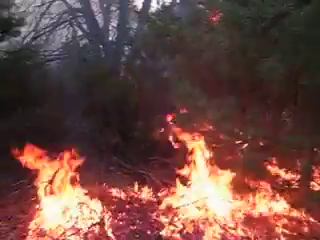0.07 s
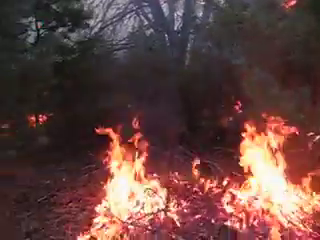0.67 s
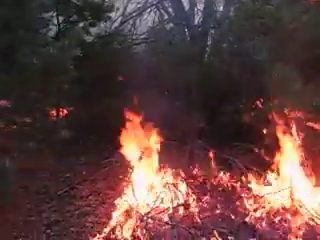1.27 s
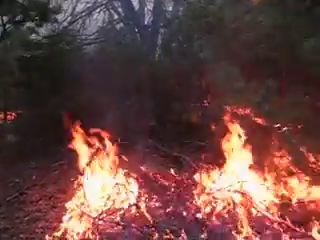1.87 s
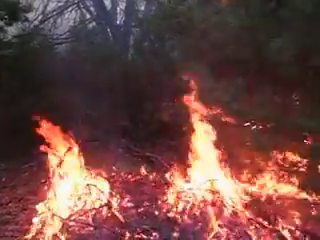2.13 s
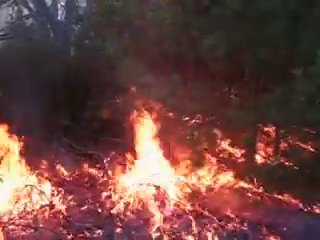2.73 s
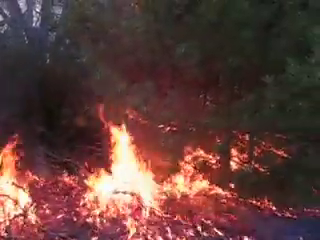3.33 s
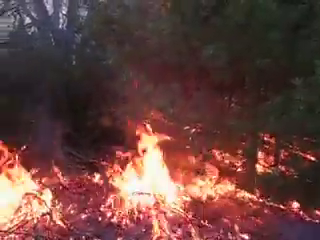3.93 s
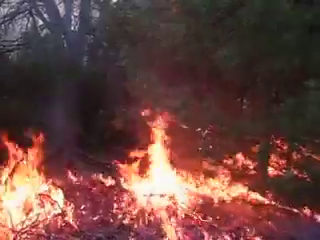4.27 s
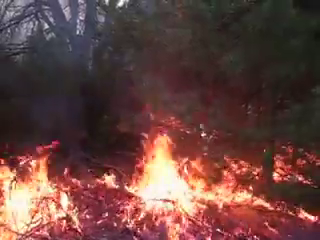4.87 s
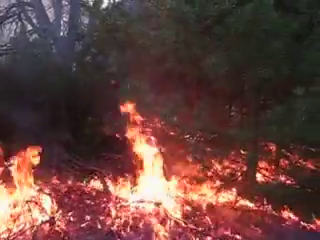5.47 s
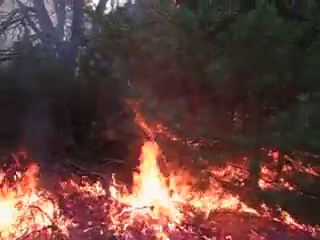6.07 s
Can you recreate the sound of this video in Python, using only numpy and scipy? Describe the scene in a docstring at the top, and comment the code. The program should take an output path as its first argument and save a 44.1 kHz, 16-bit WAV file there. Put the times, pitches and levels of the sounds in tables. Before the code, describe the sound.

A brush fire burns in a wood with a low steady roar, sizzling crackles and sharp snaps of branches.

```python
"""Two heaps of brush burn at the edge of a wood, a few metres from a small camera.
From the start the flames roar low, needles and twigs sizzle and crackle, and the camera whines faintly.
Branches snap and sticks pop throughout; the limiter ducks the roar briefly after each loud snap.
Split branches vent steam in short puffs at 1.3 s and 2.1 s, then in a longer, fainter jet at 3.5 s."""
import sys
import numpy as np
from scipy import signal
from scipy.fft import rfft, irfft, next_fast_len
from scipy.io import wavfile
from scipy.ndimage import uniform_filter1d, minimum_filter1d, map_coordinates

SR = 44100
rng = np.random.default_rng(int(sys.argv[2]) if len(sys.argv) > 2 else 0)


def persist_wave(psi):
    """Save psi, clipped to +-1, as 16-bit WAV."""
    counts = np.round(np.clip(psi, -1, 1) * 32767).astype(np.int16)
    wavfile.write(sys.argv[1], SR, np.atleast_2d(counts).T)


N = 269010


def amp(db):
    """Amplitude grows tenfold every 20 dB."""
    return 10 ** (np.asarray(db) / 20)


def unit(x):
    """Normalisation to an rms of 1."""
    return x / np.sqrt(np.mean(x ** 2) + 1e-20)


def along(points, hz):
    """Interpolation of (frequency, value) points on a logarithmic frequency axis."""
    frequencies, values = np.transpose(points)
    return np.interp(np.log(hz + 1), np.log(frequencies + 1), values)


def curves(rows):
    """Linear interpolation in time: one value per sample for each column after the first."""
    times, *columns = np.transpose(rows)
    return [np.interp(np.arange(N) / SR, times, column) for column in columns]


def wobble(rate):
    """Smooth random modulation: a spline through rate Gaussian knots a second."""
    return map_coordinates(rng.standard_normal(size=4096), [np.arange(N) * rate / SR], mode="wrap")


def filtered(x, response):
    """Linear filtering multiplies the spectrum by a frequency response."""
    size = next_fast_len(N + SR // 2)
    return irfft(rfft(x, size) * response(np.fft.rfftfreq(size, 1 / SR)), size)[:N]


def rush(spectrum, patchy_db):
    """Coloured noise of rms 1, modulated in random patches of time and frequency."""
    cells = signal.stft(rng.standard_normal(N), nperseg=512)[2]
    patches = uniform_filter1d(rng.standard_normal(cells.shape), size=9, axis=0)
    patches = uniform_filter1d(patches, size=10, axis=1)
    noise = signal.istft(cells * amp(patchy_db * unit(patches)), nperseg=512)[1][:N]
    return unit(filtered(noise, lambda hz: amp(along(spectrum, hz))))


def bursts(times, db, ring_hz, q, scatter_db, scatter_t60, size=512):
    """Impulse response: each pressure pulse rings a damped splinter and scatters off nearby twigs."""
    hz, t = np.fft.rfftfreq(size, 1 / SR), np.arange(size) / SR
    centre, width = ring_hz[:, None], (ring_hz / np.maximum(q, .3))[:, None]
    splinter = 1j * hz * width / (centre ** 2 - hz ** 2 + 1j * hz * width)
    fade = amp(-60 * t / scatter_t60)
    twigs = amp(scatter_db) * rng.standard_normal((len(times), size)) * fade / np.linalg.norm(fade)
    waves = amp(db)[:, None] * irfft(splinter * (1 + rfft(twigs)))
    where = np.round(times * SR).astype(int)[:, None] + np.arange(size)
    return np.bincount(where.ravel(), waves.ravel(), N)[:N]


def flames(roar_db):
    """Turbulent combustion radiates low noise that flutters as tongues of flame tear off."""
    # spectrum of the flames: (frequency [Hz], relative density [dB])
    spectrum = [(10, -8.5), (22, -3.5), (48, -2.5), (68, -1), (95, -4.5), (130, -5.5), (165, -8), (208, -9),
                (270, -14.5), (400, -20.5), (700, -25), (1300, -31.5), (2500, -36), (6000, -57)]
    flutter_db = 0.41 * wobble(5.69) + wobble(22)
    return amp(roar_db + 4.5 + flutter_db) * rush(spectrum, patchy_db=0.44)


def sizzle(sizzle_db):
    """Superposition: countless tiny bursts of boiling sap merge into a restless, grainy hiss."""
    # spectrum of sap boiling in needles and twigs: (frequency [Hz], relative density [dB])
    spectrum = [(200, -50), (800, -10), (1500, -6), (2200, -6.5), (3200, -1), (4300, 0.5), (5500, -4.5)]
    surge_db = 1.2 * wobble(60)
    grain_db = 3 * wobble(900)  # each tiny burst lasts about a millisecond
    hiss = unit(amp(grain_db) * rush(spectrum, patchy_db=1.0))
    return amp(sizzle_db + 4.0 + surge_db) * hiss


def whine(hz=1823):
    """The camera's faint pure tone wavers by slow phase modulation."""
    return amp(-51.0) * np.sin(2 * np.pi * hz * np.arange(N) / SR + .5 * wobble(3.9))


def crackle(sizzle_db, count=900):
    """A random point process: twigs crack in flurries, at a rate that follows the sizzle."""
    when, force, sharpness = rng.random((count, 3)).T
    activity = np.cumsum(amp(sizzle_db + 2.2 * wobble(23)))
    times = np.searchsorted(activity / activity[-1], when) / SR
    db = -10 + 15 * np.tanh(-.33 * np.log(1 - force))  # many faint ticks, few strong ones
    ring_hz = np.clip(4400 * np.exp(0.27 * rng.standard_normal(count)), 700, 6000)
    q = .9 + 3 * sharpness ** 2
    return bursts(times, db, ring_hz, q, scatter_db=-6, scatter_t60=.008)


def woodland(x, t60):
    """Reverberation: scattering by trunks and foliage returns a diffuse, exponentially decaying tail."""
    t = np.arange(SR // 2) / SR
    build_up = 1 - np.exp(-t / 0.037)
    tail = rng.standard_normal(len(t)) * amp(-60 * t / t60) * build_up
    return signal.fftconvolve(x, tail / np.linalg.norm(tail))[:N]


def snaps():
    """Fracture of thicker wood radiates a sharp report; the recoiling branch adds a dull knock."""
    # branches bursting open:
    # (time [s], impulse level [dB], resonance [Hz], quality factor [-], knock impulse level [dB])
    fractures = [(0.0528, 10, 1660, 1, 24.5), (0.1154, 11, 4200.0, 3.0, -5.5), (0.1866, 5.5, 4130, 3.0, -8),
                 (0.2356, 10.5, 4900.0, 2.6, 1), (0.4059, 10.0, 4830, 3.0, 6),
                 (0.4648, 10.5, 4500.0, 4.4, -2), (0.4867, 16.5, 2720, 0.67, 10),
                 (0.6235, 10.5, 2600.0, 1.7, 9), (0.7122, 13.5, 3640, 2.7, -4),
                 (0.7235, 13, 5100.0, 0.7, -1.0), (0.8938, 5, 4200.0, 1.5, 9.5),
                 (0.9794, 14.5, 4070, 2.4, 11), (1.0239, 13.5, 3100.0, 0.53, 9.5),
                 (1.0807, 20.5, 3300, 1.6, 2), (1.1117, 14.5, 3390, 0.89, -3.5),
                 (1.1828, 14.5, 2900, 1.8, 16.5), (1.2621, 19, 3570, 3.0, 18), (1.6127, 9, 5000.0, 1.3, 1),
                 (1.6457, 10, 2900.0, 0.42, 3.5), (1.6491, 13.5, 5200.0, 0.5, -7.5),
                 (1.666, 19.5, 4800, 0.92, 20.5), (1.775, 8, 3400, 3.9, -6), (1.7963, 24.5, 4180, 3, 9),
                 (2.0893, 9, 3200.0, 1.8, -4), (2.1285, 11.5, 5230, 1.1, -1), (2.3061, 6.5, 5130, 1.2, -5),
                 (2.3495, 9.5, 3950, 1.4, -5.5), (2.4539, 14.0, 4600.0, 2, 4.5),
                 (2.489, 10, 3400, 1.7, -4.5), (2.8105, 8, 4000.0, 2.6, 4.5), (2.9263, 6, 3020, 0.5, 0),
                 (3.0034, 16, 5200.0, 2.2, -2.0), (3.0959, 8, 2200.0, 3.0, -6),
                 (3.2494, 11.5, 3900.0, 0.7, 13.0), (3.3015, 24, 3850, 4.6, 18.5),
                 (3.366, 26.5, 2050, 1.96, 7), (3.859, 3.5, 2500.0, 1.0, 5.5), (3.948, 10, 1500, 1.9, 15.5),
                 (4.0588, 12.5, 3120, 1.3, -2.5), (4.0937, 11.5, 3000.0, 0.91, 8.0),
                 (4.4307, 10.5, 2400.0, 1.1, 3), (4.805, 16.5, 4230, 1, 4), (4.8474, 11.5, 2960, 3.2, 1),
                 (4.9473, 17.0, 1800.0, 0.66, 1.5), (5.0645, 22, 3300, 1.33, 13.5),
                 (5.2868, 14, 5230, 1.1, 2.0), (5.3309, 9.5, 2600, 1.7, 15), (5.6959, 21, 2800, 1.75, 13.5),
                 (5.751, 13, 1980, 0.39, 9), (5.9638, 14.0, 2900.0, 3.5, 1.5), (5.9983, 14, 3600.0, 0.6, 1),
                 (6.0236, 6.5, 3260, 1.8, 7)]
    times, db, ring_hz, q, knock_db = np.transpose(fractures)
    report = bursts(times, db, ring_hz, q, scatter_db=-7, scatter_t60=.008)
    branch_hz = 770 * np.exp(0.22 * rng.standard_normal(len(times)))
    knock = bursts(times, knock_db, branch_hz, q=1.1, scatter_db=-6, scatter_t60=0.017)
    return report + knock


def pops(count=36):
    """Heavily damped resonance: sticks pop at random, weaker than branches and duller than twigs."""
    when, pitch = rng.random((2, count))
    db = np.full(count, 3)
    ring_hz = 3200 * np.exp(0.44 * (2 * pitch - 1))
    return bursts(when * N / SR, db, ring_hz, q=0.63, scatter_db=-4.5, scatter_t60=0.0056)


def limiter(x, threshold_db, release_s, slope, size=33):
    """Compression: gain drops within a millisecond at a peak over the threshold, then recovers."""
    peak = -minimum_filter1d(-np.abs(x), size)
    excess = np.maximum(peak / amp(threshold_db) - 1, 1e-9)
    age = np.arange(N) / SR / release_s
    held = np.exp(np.maximum.accumulate(np.log(excess) + age) - age)  # each peak decays exponentially
    return x / (1 + uniform_filter1d(held, size, origin=size // 2)) ** slope


def steam():
    """Jet noise starts at once and sputters out as the driving pressure falls exponentially."""
    # steam escaping from split branches: (time [s], level [dB], 60 dB decay time [s])
    vents = [(1.262, -16, 0.28), (2.09, -25, 0.14), (3.538, -31, 0.87)]
    # spectrum of a steam jet: (frequency [Hz], relative density [dB])
    spectrum = [(300, -24), (1200, -9), (3000, 0.5), (5500, 1), (9000, -13.5)]
    t = np.arange(N) / SR
    pressure = sum(amp(db - 60 * np.abs(t - start) / t60) * (t > start) for start, db, t60 in vents)
    jet = filtered(rng.standard_normal(N), lambda hz: amp(along(spectrum, hz)))
    sputter = amp(2.5 * wobble(500))
    return pressure * unit(sputter * jet)


def scene():
    """The sound pressures of the fire add; the cracks and steam also reverberate among the trees."""
    # how loud the roar and sizzle are heard:
    # (time [s], relative roar level [dB], relative sizzle level [dB])
    heard_levels = [(0.0, -27.5, -39), (0.54, -27, -37), (0.85, -26.5, -39), (1.15, -29.5, -38),
                    (1.48, -25.5, -35), (1.8, -28, -40), (2.51, -26.5, -36), (3.36, -26.5, -38),
                    (3.69, -26.5, -36), (4.67, -26, -37), (4.98, -27, -37), (5.44, -26.5, -37),
                    (5.86, -26.5, -37), (6.1, -27, -34)]
    roar_db, sizzle_db = curves(heard_levels)
    wood = snaps() + pops() + crackle(sizzle_db) + steam()
    return (flames(roar_db) + sizzle(sizzle_db) + wood + amp(-18.5) * woodland(wood, t60=0.36))[None]


def record(dry):
    """Limited bandwidth and headroom: the whining camera dulls treble, limits peaks, clips the loudest."""
    # the camera's treble roll-off: (frequency [Hz], gain [dB])
    microphone = [(4700, -1), (5200, -1.5), (5550, -6.5), (5850, -15), (6100, -29.5), (6400, -49.5),
                  (7200, -72)]
    top_hz = 16600
    heard = filtered(dry[0] + whine(), lambda hz: amp(along(microphone, hz)))
    limited = limiter(heard, threshold_db=-9.0, release_s=0.027, slope=0.58)
    clipped = np.clip(limited, -.71, .71)
    return filtered(clipped, lambda hz: 1 / (1 + (hz / top_hz) ** 120))[None]


dry = scene()
out = record(dry)
persist_wave(out)
```